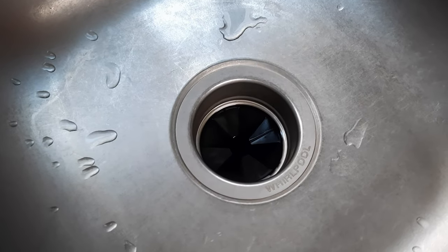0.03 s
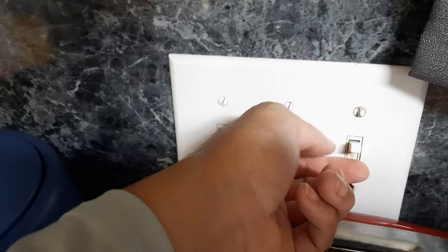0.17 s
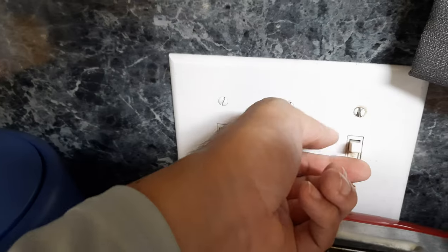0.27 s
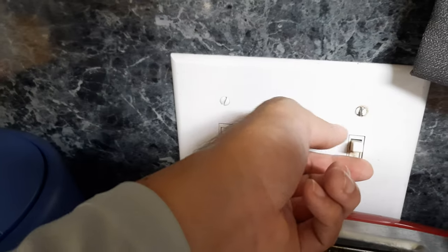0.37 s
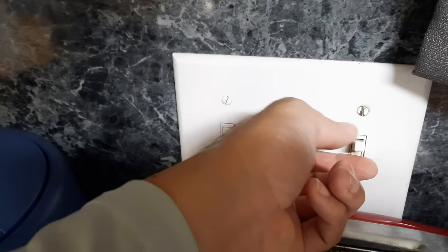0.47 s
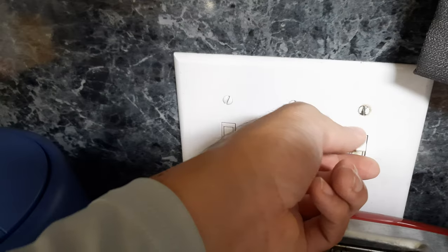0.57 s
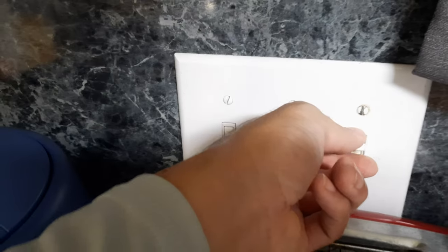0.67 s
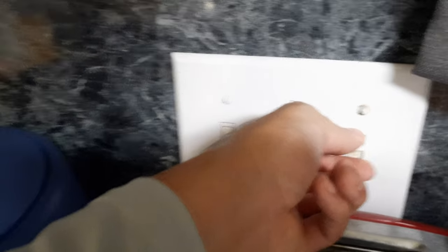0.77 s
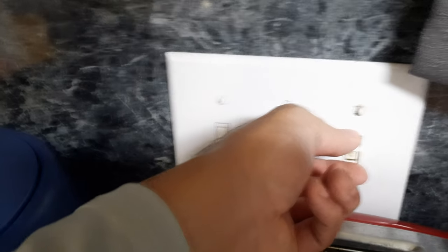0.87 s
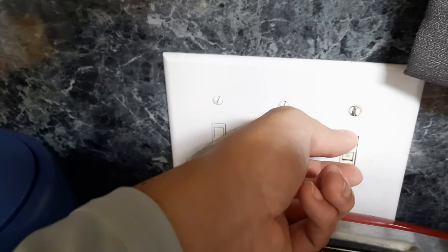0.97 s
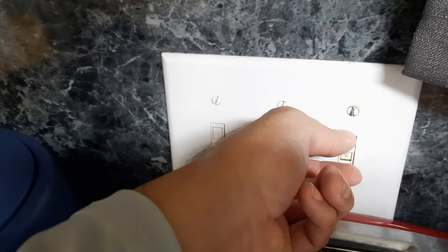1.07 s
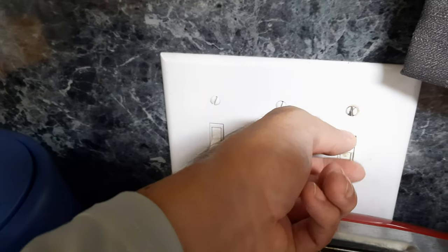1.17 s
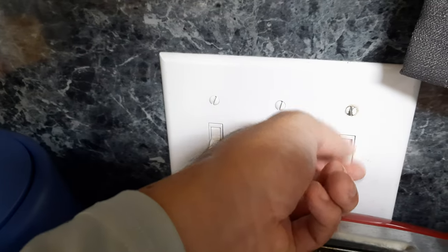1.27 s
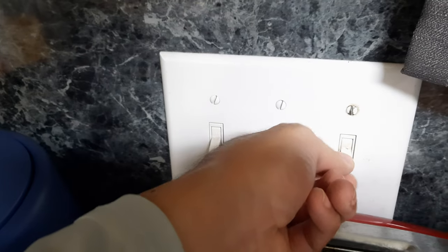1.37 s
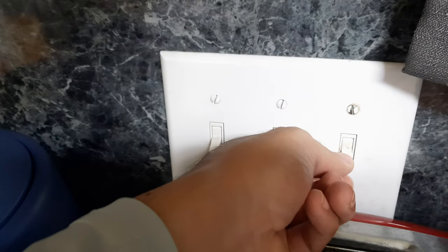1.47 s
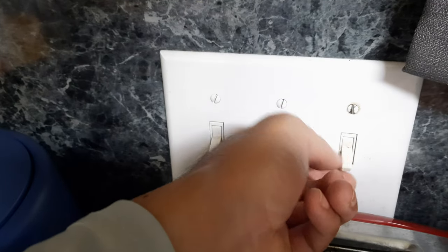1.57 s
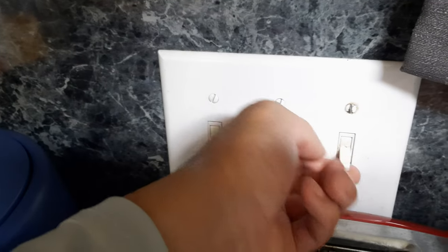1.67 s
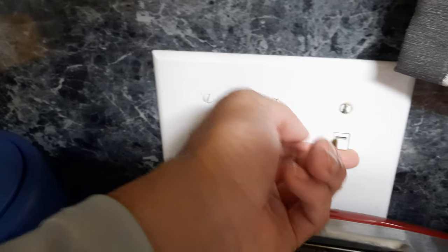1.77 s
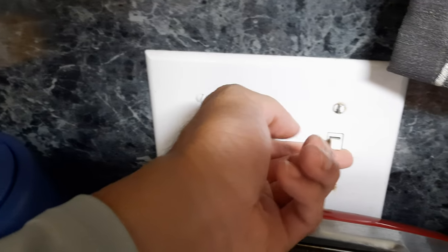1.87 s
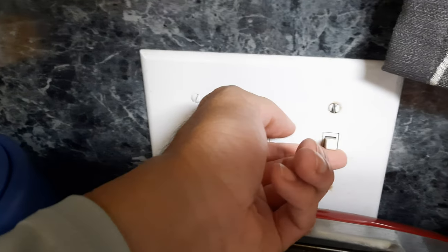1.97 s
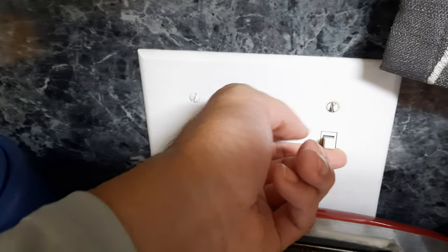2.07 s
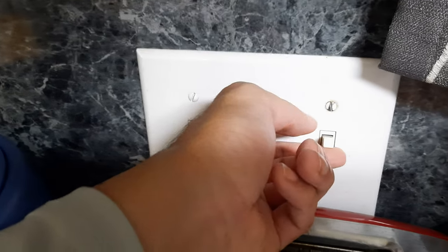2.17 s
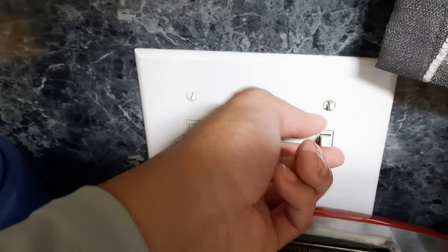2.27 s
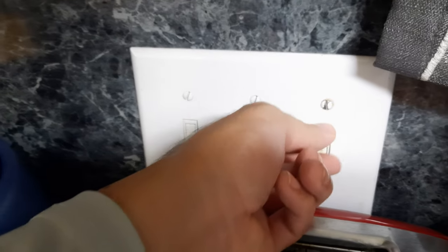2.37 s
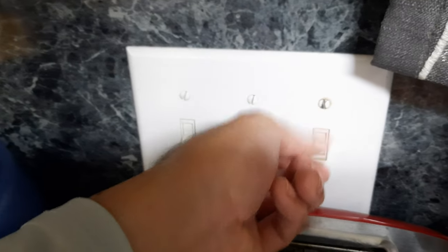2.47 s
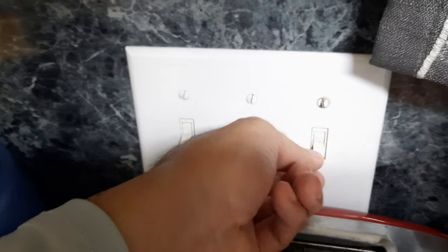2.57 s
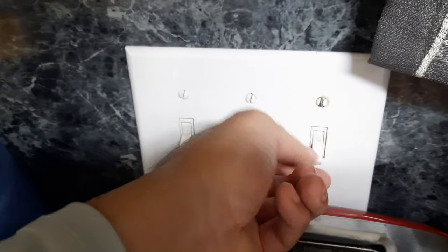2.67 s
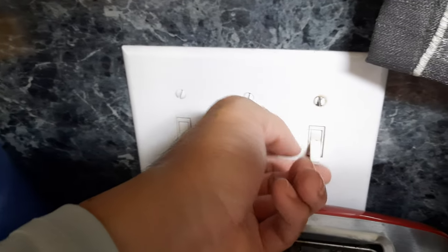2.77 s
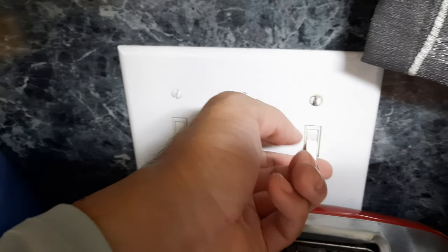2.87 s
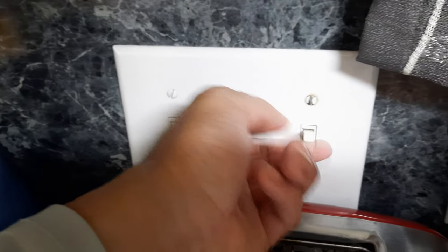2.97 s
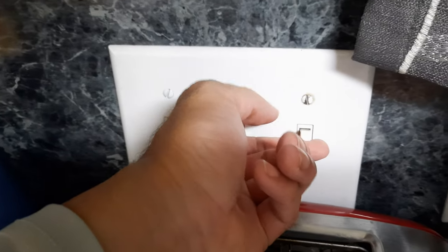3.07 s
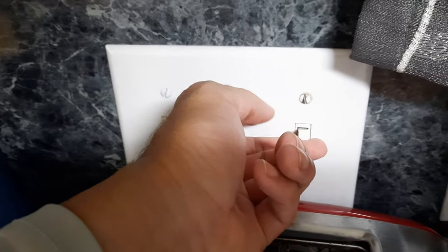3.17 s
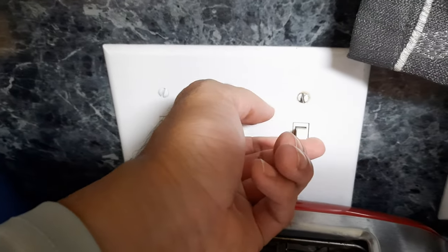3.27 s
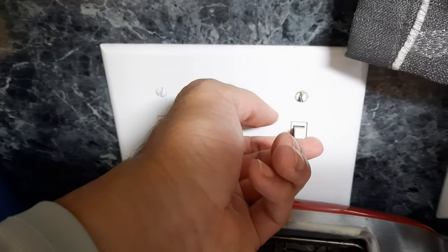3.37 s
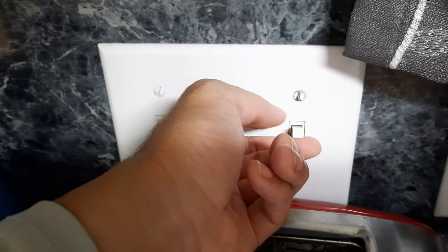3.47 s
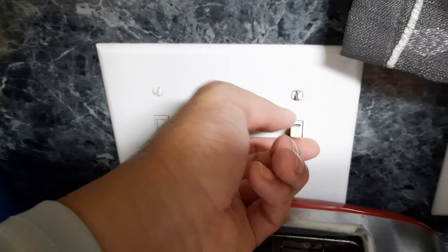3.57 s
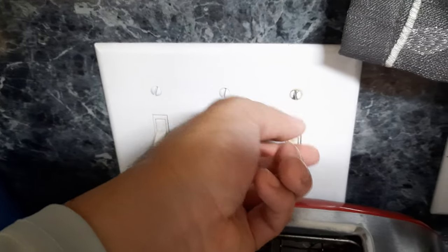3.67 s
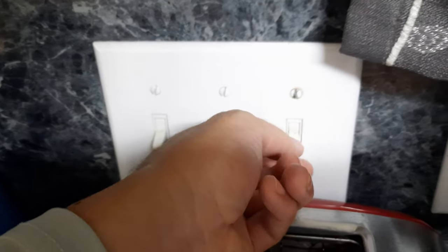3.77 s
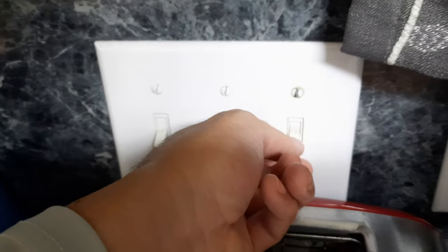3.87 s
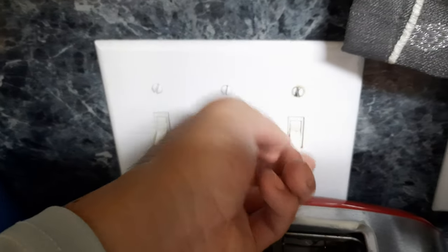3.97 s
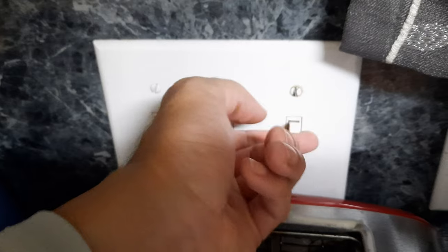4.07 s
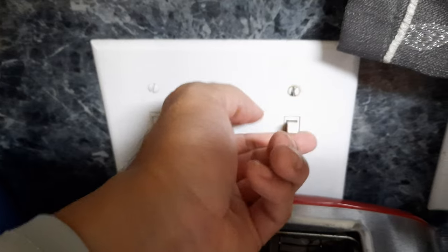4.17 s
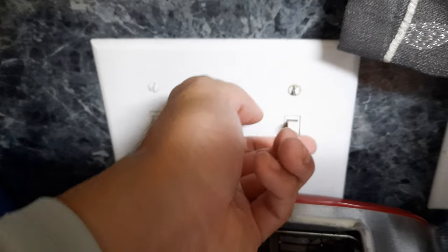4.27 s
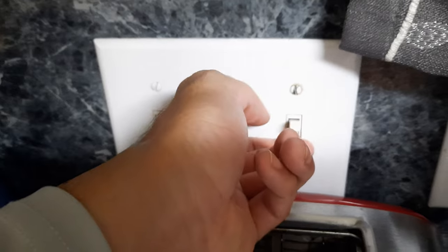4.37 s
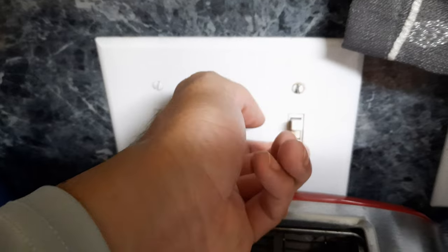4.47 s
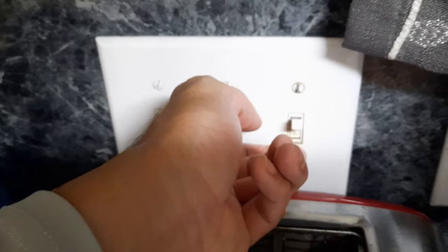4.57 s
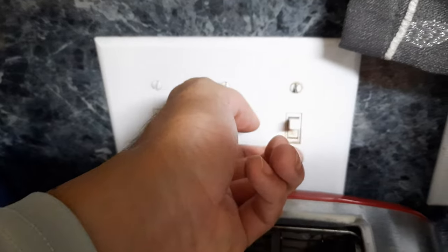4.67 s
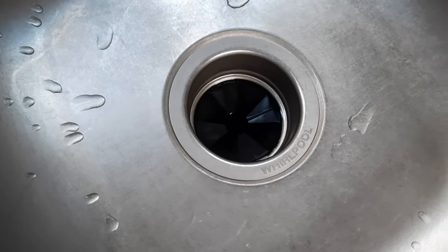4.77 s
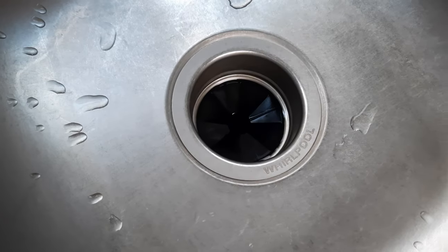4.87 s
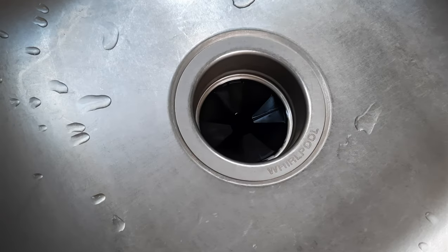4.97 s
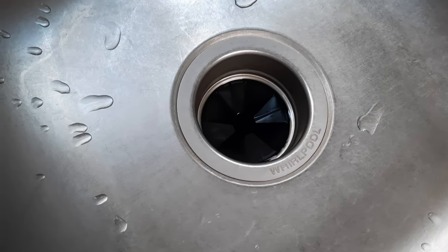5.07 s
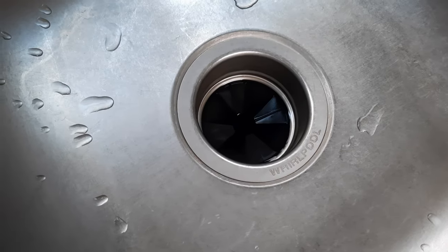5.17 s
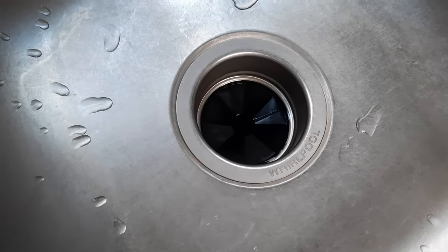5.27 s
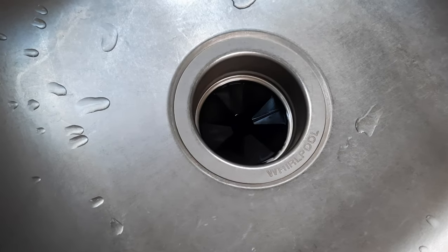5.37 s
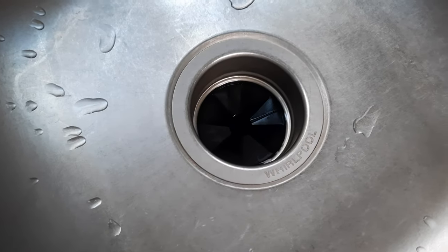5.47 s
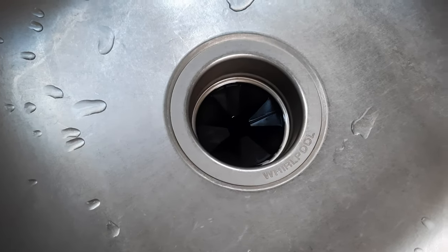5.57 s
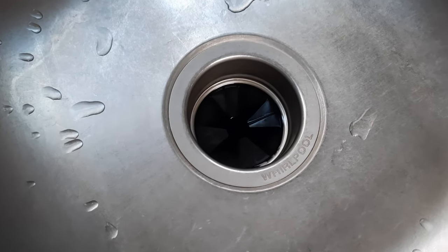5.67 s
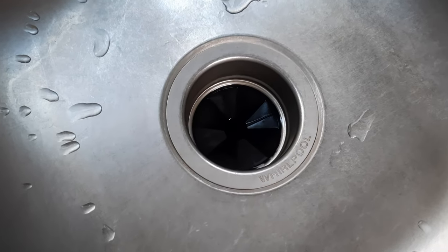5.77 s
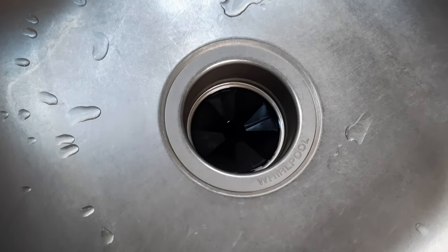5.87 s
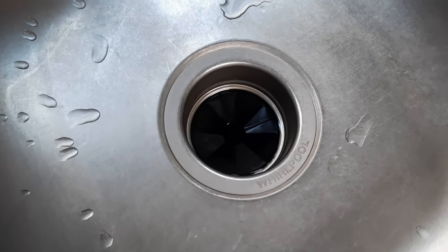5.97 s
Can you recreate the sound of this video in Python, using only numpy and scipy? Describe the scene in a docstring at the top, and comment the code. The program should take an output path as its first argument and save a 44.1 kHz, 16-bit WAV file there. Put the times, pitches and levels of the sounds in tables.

```python
"""A quiet kitchen is heard from the start and throughout: soft air noise, a faint hum, low rumble and hiss,
and a hollow sink ring that is stronger at the start and end.
Over it, fingers brush (tiny noise grains) and softly bump a switch plate, and its lever gives light ticks.
Among these, a thumb throws the lever on and off, close to a phone: each throw is a quick run of impacts
that rings the plate and wall, with short echoes and a small-room tail. Eased throws are duller and softer."""
import sys
import numpy as np
from scipy import signal
from scipy.fft import rfft, irfft
from scipy.io import wavfile
from scipy.ndimage import uniform_filter1d

SR = 44100
rng = np.random.default_rng(int(sys.argv[2]) if len(sys.argv) > 2 else 0)


def wrap_up_sound(samples):
    """Save the sound to the file named by the first command line argument, as 16-bit audio."""
    columns = np.atleast_2d(samples).T
    # keep every value between -1 and 1, then stretch to whole-number steps
    tamed = np.clip(columns, -1, 1)
    steps = np.round(tamed * 32767).astype(np.int16)
    wavfile.write(sys.argv[1], SR, steps)


N = 265923
RING = np.arange(SR) / SR  # one second of time, for single sounds (s)
TIME = np.arange(N) / SR  # time through the whole scene (s)

# background air, shape of its spectrum: (f/Hz, relative level/dB per Hz)
AIR = [(15, -30.5), (30, -15), (55, -4.5), (100, -7), (146, -16), (240, -20), (320, -25.5), (560, -29),
       (1000, -33), (1540, -39.5), (1900, -40), (2930, -42), (5000, -48.5), (15000, -50.5)]
# steady hum tones: (f/Hz, rms level/dB)
HUM = [(80.7, -67.5), (119, -69), (241, -74.5), (360, -83), (480, -87)]
# hollow ring of the steel sink: (f/Hz, half-width of each filter/Hz, relative level/dB)
SINK = [(806, 21, -3), (1068, 35, -0.5), (1270, 60, -8.5), (1350, 29, -0.5), (1415, 20, 1.5),
        (1564, 28, -1), (2900, 120, -20.5)]
# rumble of the held phone, shape of its spectrum: (f/Hz, relative level/dB)
RUMBLE = [(15, -22), (35, -12.5), (58, 0.0), (110, -6.0), (190, -13), (300, -26.5), (700, -34.5), (2000, -71.5)]
# skin sliding on the plastic: (t/s, length/s, level/dB, lower edge f/Hz, upper edge f/Hz)
BRUSHES = [(0.271, 0.052, -56.5, 830, 9550), (0.325, 0.054, -73.5, 2500, 4500),
           (1.342, 0.027, -59.5, 400, 3400), (2.23, 0.066, -67, 1600, 3030),
           (2.357, 0.049, -80, 2700, 4190), (3.754, 0.033, -53, 300, 3700),
           (4.56, 0.037, -82.5, 3613, 4810)]
# fingers bumping the lever and plate: (t/s, level/dB, softening corner f/Hz, wall thump level/dB)
BUMPS = [(0.365, -22.5, 554, -42.5), (0.8565, -32, 250, -50.5), (2.027, -32, 697, -51.5),
         (2.338, -22.5, 330, -40.5), (3.2609, -29.5, 482, -54.5), (3.303, -26.5, 200, -42.5),
         (3.755, -24.5, 327, -54), (4.402, -37.5, 301, -56.5), (4.547, -44, 250, -52.5)]
# ticks of the lever taking up its play: (t/s, level/dB)
TICKS = [(1.332, -36.5), (2.028, -53), (2.5316, -39), (3.733, -47), (3.753, -37.5)]
# throws of the lever: (t/s, level/dB, softening corner f/Hz, position 1 = on 0 = off, wall thump level/dB)
THROWS = [(1.361, -18, 2060, 1, -35.5), (1.7905, -2.5, 15400, 0, -49), (2.5429, -0.5, 12060, 1, -33),
          (3.0239, -3, 15000, 0, -48.5), (3.7779, -17, 2124, 1, -30), (4.0864, -2.5, 15000, 0, -36.5)]
# impacts in one throw, as the lever slips, the spring tips over, the contact lands and the lever stops:
# (delay/ms, level/dB)
OFF_IMPACTS = [(0, -20.5), (1.1, 3), (2.45, -21.5), (5.83, -12)]
ON_IMPACTS = [(0, -33), (1.1, 0.5), (2.21, -12.5), (4.97, -17)]
# ringing tones of switch, plate and box: (f/Hz, t60/s, level when thrown off/dB, level when thrown on/dB)
PLATE_MODES = [(179, 0.042, -22, -24.5), (269, 0.027, -12, -16), (318, 0.047, -16.5, -30),
               (508, 0.074, -24.5, -25), (618, 0.076, -25.5, -33), (718.2, 0.029, -5, -5),
               (735.3, 0.015, -2, 0), (863, 0.036, -10, -7), (1153, 0.063, -33.5, -31.5),
               (1262, 0.066, -23.5, -21), (1385, 0.109, -30.5, -25.5), (1514, 0.1, -31.5, -31.5),
               (1620, 0.068, -34, -33), (1662, 0.023, -22, -30.5), (1870, 0.041, -30.5, -39),
               (1925, 0.026, -26.5, -33), (2248, 0.062, -30, -30.5), (2433, 0.045, -31, -28),
               (2607, 0.09, -27, -30.5), (2780, 0.031, -27.5, -26), (2900, 0.068, -33.5, -34.5),
               (3007, 0.061, -33, -27), (3365, 0.021, -27, -28), (3435, 0.045, -32, -38),
               (3757, 0.012, -32.5, -41), (4026, 0.08, -39, -43), (5280, 0.035, -42, -39),
               (5760, 0.04, -42.5, -32), (7220, 0.099, -50, -52.5), (10370, 0.05, -53.5, -57.5)]
# ringing tones of the wall behind the plate: (f/Hz, t60/s, level/dB)
WALL_MODES = [(58.3, .3, -13), (115, 0.11, -8), (146, 0.071, 2.5), (201, 0.15, -3), (254.7, 0.098, -1.5)]
# crack of hard plastic, shape of its spectrum: (f/Hz, relative level/dB)
CRACK = [(1500, -25.5), (3000, -3), (3800, 4), (4400, -10.5), (5600, -4.5), (6400, -19), (7300, -10),
         (8500, -21.5), (10400, -17.5), (13000, -31.5), (16000, -32)]
# echoes from the counter and nearby things: (delay/ms, level/dB)
ECHOES = [(3.74, -21.5), (12.09, -14.5), (16.19, -17.5)]
# diffuse sound of the kitchen: (f/Hz, relative level/dB, t60/s)
ROOM = [(100, -22, .35), (248, -3, 0.33), (550, -1.5, 0.24), (850, -2.5, 0.27), (1150, -10, .25),
        (2000, -14.5, 0.26), (3340, -20, 0.24), (4700, -27.5, .18), (7500, -30, 0.16), (9600, -37.5, 0.15),
        (15000, -45, .15)]
# standing waves of the kitchen: (f/Hz, t60/s, level/dB)
STANDING = [(188.4, 0.85, -36), (237, 0.36, -37), (329.7, 0.16, -30.5), (469.5, 0.092, -27),
            (614, 0.22, -41), (680, 0.38, -44.5), (721, 0.22, -38), (821, 0.31, -37.5), (928, 0.25, -41.5),
            (949, 0.27, -44), (1016.4, 0.27, -40), (1305, 0.31, -42.5), (2088, 0.11, -42)]

ARRIVE_S, LEAVE_S = 0.234, 4.81  # the phone is at the switch between these times, otherwise over the sink
SINK_NEAR_DB, SINK_FAR_DB = -72.5, -79.5  # sink ring heard from above it and from the switch
# rumble at rest, while the other hand works the switch, and the jolt from a throw of 0 dB
REST_DB, REACH_DB, JOLT_DB = -68.5, -60, -54.5
SETTLE_S = 0.18  # time for a jolt to fall to about a third
THROW_ROOM_DB = 2.5  # how strongly a throw sounds the kitchen
TOP_HZ = 15750  # highest pitch the phone lets through


def undb(db):
    """Turn decibels into a plain multiplier."""
    return 10 ** (np.asarray(db) / 20)


def unit(x):
    """Scale to rms 1."""
    return x / np.sqrt(np.mean(x ** 2))


def add(out, s, x):
    """Mix x in from time s."""
    i = int(s * SR)
    out[i:i + len(x)] += x[:N - i]


def coloured(points, size):
    """Noise of rms 1 whose spectrum follows (Hz, dB) points."""
    hz, db = np.transpose(points)[:2]
    f = np.maximum(np.fft.rfftfreq(size, 1 / SR), 1)
    gain = undb(np.interp(np.log(f), np.log(hz), db))
    return unit(irfft(rfft(rng.standard_normal(size)) * gain, size))


def walk():
    """Slow random wander of spread 1."""
    return coloured([(1, -20), (2, 0), (5, 0), (10, -20), (30, -90)], N)


def fade(t60):
    """Free decay: the level falls 60 dB in t60 seconds."""
    return np.exp(-np.log(1000) * RING / t60)


def soften(x, hz):
    """A softer contact pushes for longer and loses the treble above its corner."""
    pole = np.exp(-2 * np.pi * hz / SR)
    return signal.lfilter([(1 - pole) ** 2], [1, -2 * pole, pole ** 2], x)


def ring(modes):
    """A struck object sounds several fading tones; neighbours start in opposite directions."""
    out = 0
    for k, (hz, t60, db) in enumerate(modes):
        out = out + (-1) ** k * undb(db) * fade(t60) * np.sin(2 * np.pi * hz * RING)
    return out


def repeat(x, copies):
    """Sum of delayed copies (ms, dB); working on the spectrum allows delays of part of a sample."""
    f = np.fft.rfftfreq(2 * len(x), 1 / SR)
    comb = sum(undb(db) * np.exp(-2j * np.pi * f * ms / 1000) for ms, db in copies)
    return irfft(rfft(x, 2 * len(x)) * comb)[:len(x)]


def at_switch():
    """1 while the phone is at the switch, 0 while it is over the sink, with short ramps between."""
    inside = (TIME > ARRIVE_S) & (TIME < LEAVE_S)
    return uniform_filter1d(inside.astype(float), size=500)


def shake(reaching):
    """Strength of the handling rumble: greater while reaching, and every throw adds a jolt that settles."""
    out = undb(REST_DB + (REACH_DB - REST_DB) * reaching)
    for s, db, *_ in THROWS:
        add(out, s, undb(JOLT_DB + db) * np.exp(-RING / SETTLE_S))
    return out


def steady_hum(waver_rad=.3):
    """Steady-level tones whose phase wanders a little."""
    # the root of 2 turns an rms level into a sine's peak
    return sum(undb(db) * np.sqrt(2) * np.sin(2 * np.pi * hz * TIME + waver_rad * walk()) for hz, db in HUM)


def sink_ring(reaching, swell_db=2.3):
    """Noise through narrow resonances of the sink, each swelling at random; fainter at the switch."""
    out = 0
    for hz, half_width, db in SINK:
        b, a = signal.iirpeak(hz, hz / (2 * half_width), fs=SR)
        tone = signal.lfilter(b, a, rng.standard_normal(N))
        tone = signal.lfilter(b, a, tone)  # a second pass makes the peak steeper
        out = out + undb(db + swell_db * walk()) * tone
    return undb(SINK_NEAR_DB + (SINK_FAR_DB - SINK_NEAR_DB) * reaching) * unit(out)


def background(air_db=-64, hiss_db=-82, sway_db=3.0):
    """Still air, hum, the sink's hollow ring, swaying handling rumble and microphone hiss, throughout."""
    reaching = at_switch()
    air = undb(air_db) * coloured(AIR, N)
    rumble = shake(reaching) * undb(sway_db * walk()) * coloured(RUMBLE, N)
    hiss = undb(hiss_db) * rng.standard_normal(N)
    return air + steady_hum() + sink_ring(reaching) + rumble + hiss


def brushes(grain_db=6, wet_db=-32, wet_t60=0.15, catch_db=2.0, attack_s=.002):
    """Skin catches and slips in dense tiny grains, in uneven spurts, smeared by the room."""
    out = np.zeros(N)
    for s, length, db, low_hz, high_hz in BRUSHES:
        spurts = unit(uniform_filter1d(rng.standard_normal(SR), size=300))
        grain_level = grain_db * rng.standard_normal(SR) + catch_db * spurts
        grains = rng.standard_normal(SR) * undb(grain_level)
        band = signal.butter(3, [low_hz, max(high_hz, low_hz + 100)], "band", fs=SR, output="sos")
        grains = unit(signal.sosfilt(band, soften(grains, high_hz / 2)))
        stroke = (1 - np.exp(-RING / attack_s)) * np.exp(-(RING / length) ** 4)
        add(out, s, undb(db) * grains * stroke)
    smear = rng.standard_normal(SR) * fade(wet_t60)
    return out + undb(wet_db) * signal.fftconvolve(out, smear)[:N]


def kitchen(build_s=.013, tail_db=-28.0):
    """Room response: a diffuse tail that builds up, then mostly loses its treble first."""
    hz, _, t60 = np.transpose(ROOM)
    noise = rfft(coloured(ROOM, SR))
    log_f = np.log(np.maximum(np.fft.rfftfreq(SR, 1 / SR), 1))
    tail = 0
    # overlapping bands, each with its own decay
    for share, t in zip(np.eye(len(hz)), t60):
        band = noise * np.interp(log_f, np.log(hz), share)
        tail = tail + irfft(band, SR) * fade(t)
    return undb(tail_db) * tail * (1 - np.exp(-(RING / build_s) ** 2))


def plate(on, crack_db=-28.0, crack_t60=0.036, spread_s=0.0011):
    """One impact on the switch with its echoes; the lever's position sets how strongly each tone rings."""
    body = ring([(hz, t60, on_db if on else off_db) for hz, t60, off_db, on_db in PLATE_MODES])
    # the dense high tones swell as the blow spreads through the plastic
    crack = undb(crack_db) * coloured(CRACK, SR) * fade(crack_t60) * (1 - np.exp(-RING / spread_s))
    direct = (0.0064, 0.00065)  # the impact itself, almost undelayed (ms, dB)
    return repeat(body + crack, [direct] + ECHOES)


def bumps(room):
    """A fingertip lands with one soft push that sounds the plate, wall and room."""
    out = np.zeros(N)
    knock = plate(False) + room + ring(STANDING)
    for s, db, corner_hz, thump_db in BUMPS:
        add(out, s, undb(db) * soften(knock, corner_hz) + undb(thump_db) * ring(WALL_MODES))
    return out


def ticks(room, low_hz=1800):
    """The lever shifts in its pivot: a touch so light that the low tones are weak."""
    out = np.zeros(N)
    high_pass = signal.butter(1, low_hz, "high", fs=SR, output="sos")
    tick = signal.sosfilt(high_pass, plate(False) + room)
    for s, db in TICKS:
        add(out, s, undb(db) * tick)
    return out


def switch(room):
    """Every throw is a run of impacts on plate, wall and room; eased throws are duller."""
    out = np.zeros(N)
    sides = (plate(False), plate(True))
    room_gain = undb(THROW_ROOM_DB)
    for s, db, corner_hz, position, thump_db in THROWS:
        on = int(position > .5)
        snap = repeat(sides[on] + room_gain * room, ON_IMPACTS if on else OFF_IMPACTS)
        snap = snap + room_gain * ring(STANDING)
        add(out, s, undb(db) * soften(snap, corner_hz) + undb(thump_db) * ring(WALL_MODES))
    return out


def scene():
    """Fingers and switch in the quiet kitchen, as one channel."""
    room = kitchen()
    return (background() + brushes() + bumps(room) + ticks(room) + switch(room))[None]


def record(dry):
    """The phone cuts the very highest treble with a steep filter."""
    return signal.sosfilt(signal.ellip(10, .1, 70, TOP_HZ, fs=SR, output="sos"), dry)


dry = scene()
out = record(dry)
wrap_up_sound(out)
```